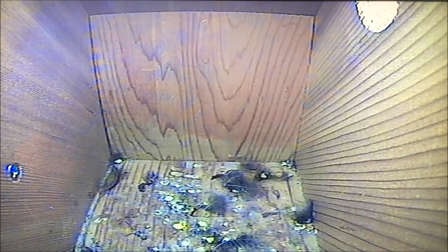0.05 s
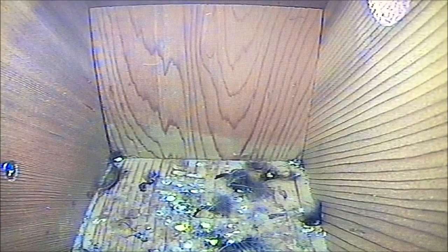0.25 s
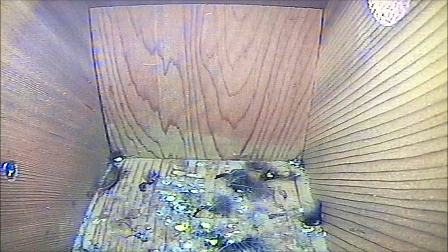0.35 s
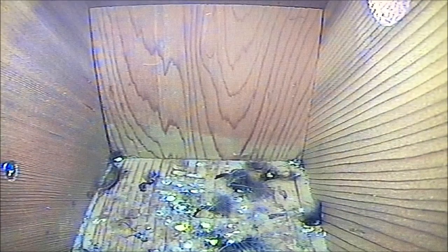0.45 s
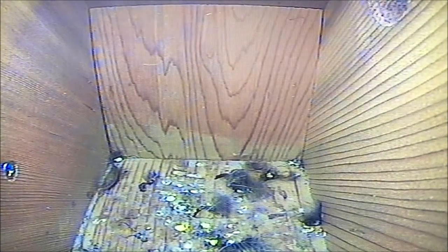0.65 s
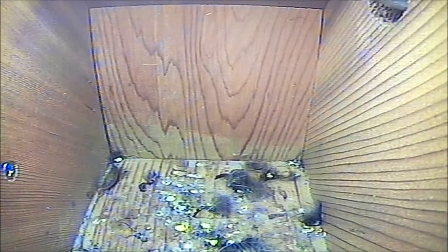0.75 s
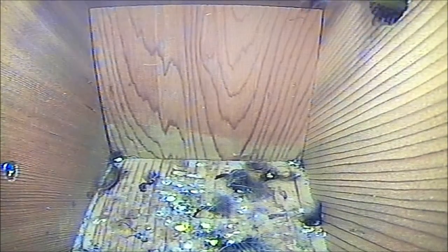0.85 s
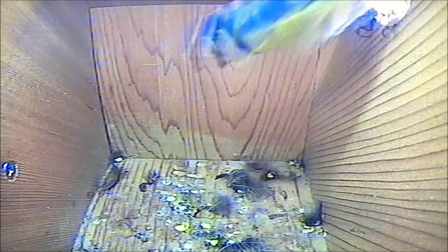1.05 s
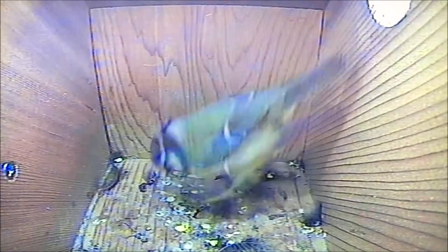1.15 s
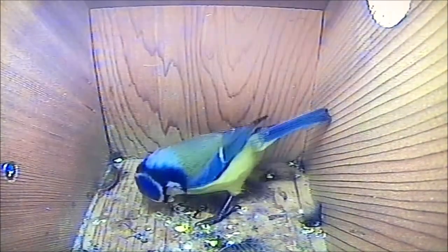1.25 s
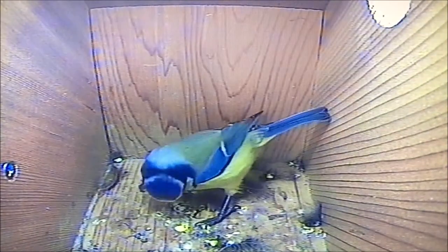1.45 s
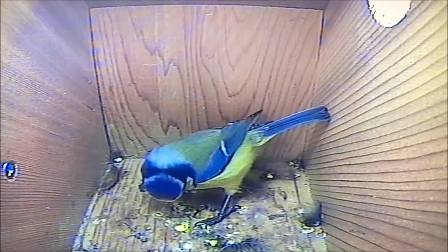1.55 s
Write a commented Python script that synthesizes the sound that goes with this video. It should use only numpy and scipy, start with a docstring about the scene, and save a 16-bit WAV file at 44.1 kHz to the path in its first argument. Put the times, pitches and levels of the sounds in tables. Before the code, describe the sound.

A small bird's claws scuff on a wooden nest box, heard from inside, starting at 0.2 seconds. At 0.5 seconds it lands with a sharp, hollow tap, the loudest moment. Wings brush softly at 1.1 seconds, then light scratchy steps follow from 1.2 to 1.6 seconds. Far outside, another bird whistles thinly, trilling from 1.1 seconds, over faint steady hum, outdoor air and hiss.

```python
"""Inside a wooden nest box, a small bird is heard scuffing on the outer wall, landing hard at the
entrance hole, fluttering down and shuffling on the floor. Its claws catch and slip, which makes the
panels ring; its weight thumps the box and its wings brush the walls. Far off, another bird whistles
and trills among echoing trees, over mains hum, outdoor air and faint hiss.
The sound switches on a moment after the start."""
import sys
import numpy as np
from scipy import signal
from scipy.fft import rfft, irfft
from scipy.io import wavfile
from scipy.ndimage import uniform_filter1d

SR = 44100
rng = np.random.default_rng(int(sys.argv[2]) if len(sys.argv) > 2 else 0)


def log_audio(samples):
    """Write samples as a 16-bit WAV file to the path given in sys.argv[1]."""
    # one column per channel
    frames = np.atleast_2d(samples).T
    # limit to full scale, then quantise
    limited = np.clip(frames, -1, 1)
    pcm = np.round(limited * 32767).astype(np.int16)
    wavfile.write(sys.argv[1], SR, pcm)


N = 70560
T = np.arange(N) / SR

WALL, ENTRANCE, FLOOR = range(3)   # places the bird touches
# The tones the box rings at, and how strongly a touch at each place wakes them:
# (pitch [Hz], time to fade 60 dB [s], outer wall [dB], entrance [dB], floor [dB])
BOX_TONES = [(174.7, 0.076, -5, -30, -23.5), (292.8, 0.19, -6.5, -18, -17), (414.8, 0.08, -2, -11, -27),
             (514.5, 0.048, -2, -14.5, -20), (612.5, 0.084, -7, -19.5, -18.5),
             (657.6, 0.076, -8.5, -11.5, -19.5), (961.5, 0.042, -8, -16, -16), (1071.3, 0.079, 3, -18, -19),
             (1179, 0.089, -8.5, -12.5, -9.5), (1333.6, 0.065, -3, -1, -5.5), (1456.2, 0.079, -3, 0.5, 2),
             (1630.5, 0.1, -1, -2, -9.5), (1741, 0.093, -3.5, 0, -12.5), (1856, 0.09, -1, -14.5, -8.5),
             (1915, 0.057, -13, -9, -34), (2260, 0.12, -27, -21, -29), (2575, 0.056, -15, -19.5, -26),
             (2872, 0.11, -29, -17, -33), (3330, 0.1, -24.5, -20, -21.5), (3346, 0.048, -24, -15, -27.5),
             (3650, 0.063, -17.5, -15, -24), (4350, 0.064, -15.5, -22.5, -37),
             (4580, 0.032, -38, -21.5, -23), (5580, 0.032, -44, -24, -44)]
# Foot scuffs: (time [s], length [s], ring level [dB], rasp level [dB], thump level [dB], place)
FOOT_SCUFFS = [(0.199, 0.028, -44, -73, -68, WALL), (0.228, 0.021, -45, -63, -87, WALL),
               (.324, 0.01535, -45.5, -87, -52.5, WALL), (0.375, 0.044, -50, -60, -59, WALL),
               (0.434, 0.0173, -44.5, -57.5, -43.5, WALL), (0.462, 0.0084, -55.5, -64, -51.5, WALL),
               (.51, 0.0053, -36, -54.5, -89, ENTRANCE), (.517, 0.0158, -29.5, -45, -91, ENTRANCE),
               (1.209, 0.0117, -60, -60, -84, FLOOR), (1.309, 0.022, -44.5, -64, -76, FLOOR),
               (1.408, 0.019, -48, -84, -86, FLOOR), (1.48, .014, -53, -78, -65, FLOOR),
               (1.591, .014, -50, -60.5, -63, FLOOR)]
# Tone colour of claws rasping on wood: (frequency [Hz], relative level [dB])
RASP_COLOUR = [(200, 4), (450, 14.5), (800, -9), (1600, -4), (2400, -6), (3400, 2.5), (4500, -4.5),
               (5000, -10.5), (6200, -5.5), (7100, -22), (8050, -6.5), (8800, -22), (10500, -17.5),
               (15000, -42)]
# Claw tips skating lightly over the wood: (time [s], length [s], level [dB])
CLAW_TICKS = [(0.38, 0.094, -65.5), (0.44, 0.014, -60), (1.262, 0.0049, -63.5), (1.457, 0.01, -62.5)]
# Tone colour of those ticks: (frequency [Hz], relative level [dB])
CLAW_TICK_COLOUR = [(1000, -3), (2600, 1.5), (3500, 2), (4500, -5), (5200, -13), (6100, -4), (7000, -17),
                    (8000, -12), (9000, -17), (10500, -12), (14000, -30)]
# Tone colour of feathers brushing wood: (frequency [Hz], relative level [dB])
WING_COLOUR = [(500, 5.5), (1600, 4.5), (2600, -1), (3600, 2.5), (6000, -1.5), (8500, -13), (14000, -27)]
# The far bird's whistles: (time [s], length [s], pitch [Hz], slide [Hz], level [dB], relative echo [dB])
SONG_NOTES = [(0.224, .018, 6950, -54, -70, -10), (.249, 0.028, 6920, -2, -68, 0),
              (0.28, 0.021, 7800, 97, -71.5, 2), (.313, 0.025, 7950, -200, -68.5, 1),
              (0.395, 0.011, 8000, 153, -68.5, -8), (0.418, 0.1, 4625, -30, -61, 0.5),
              (0.554, 0.16, 8150, -200, -69, -11), (0.72, 0.07, 5434, -35, -65, -2),
              (0.776, .04, 5750, 491, -68.5, 6), (0.829, 0.067, 7190, -950, -65, 3.5),
              (.88, .06, 6280, -1200, -67.5, 17), (0.976, 0.063, 7150, -950, -66, 4),
              (1.038, 0.059, 6480, -1600, -68, 2)]
# The two falling notes its trill repeats: (delay [s], length [s], pitch [Hz], slide [Hz], level [dB])
TRILL_NOTES = [(0, 0.0144, 5616, -700, -72), (0.022, 0.0169, 4460, -1100, -67.5)]
# Steady tones of the hum: (pitch [Hz], level [dB])
HUM_TONES = [(49.7, -60.5), (199.5, -67), (286, -65.5), (351, -72.5), (602, -76.5)]
# Tone colour of the outdoor air: (frequency [Hz], relative level [dB])
AIR_COLOUR = [(15, -37), (25, -9), (59, -1.5), (140, -8), (204, -10), (246, -10.5), (389, -9), (495, -15),
              (598, -19), (762, -20.5), (1410, -14.5), (1900, -21), (2420, -37), (3440, -25.5), (4870, -28),
              (5730, -30), (7100, -34.5), (7700, -35.5), (15500, -39.5)]
# Tone colour of the microphone's hiss: (frequency [Hz], relative level [dB])
HISS_COLOUR = [(2000, 8), (5000, 1.5), (9000, -4), (15500, -22)]

GRIP_SHARE = 0.3   # the part of a scuff spent pressing in


def feet():
    """Each scuff rings the box, rasps and thumps with the bird's weight; light ticks only rasp."""
    out, t = np.zeros(N), T[:SR // 4]
    thump = thud(hz=164.6, rise_s=0.0068)
    for start, length, ring_db, rasp_db, thump_db, place in FOOT_SCUFFS:
        add(out, start, from_db(ring_db) * box_ring(foot_pressure(t, length), place))
        add(out, start, from_db(rasp_db) * claw_rasp(t, length, RASP_COLOUR))
        add(out, start, from_db(thump_db) * thump)
    for start, length, db in CLAW_TICKS:
        add(out, start, from_db(db) * claw_rasp(t, length, CLAW_TICK_COLOUR))
    add(out, 0.57, from_db(-53) * thud(hz=44.7, rise_s=0.029))   # the landing rocks the box
    after_ring = signal.fftconvolve(out, echo_tail(fade_s=0.44))[:N]   # the whole box rings on faintly
    return out + from_db(-11) * after_ring


def foot_pressure(t, length):
    """A foot presses in, holds and lets go."""
    press = np.clip(t / (GRIP_SHARE * length), 0, 1)
    let_go = np.clip((length - t) / (length / 10), 0, 1)
    return press * let_go


def claw_slips(force, slips_per_s=2500, spread_db=2):
    """A dragged claw catches and slips in tiny uneven clicks, louder the harder it presses."""
    n = len(force)
    sizes = from_db(spread_db * rng.standard_normal(n)) * rng.choice([-1, 1], n)
    return force * sizes * (rng.random(n) < slips_per_s / SR)


def box_ring(force, place, band_ratio=1.16):
    """Claw slips set each tone of the box ringing, as strongly as the touched place allows."""
    out = 0
    for hz, fade_s, *place_db in BOX_TONES:
        band = signal.butter(2, [hz / band_ratio, hz * band_ratio], "band", fs=SR, output="sos")
        clicks = claw_slips(force) + 1e-18 * rng.standard_normal(len(force))
        tone = ring(signal.sosfilt(band, clicks), hz, fade_s)
        out = out + from_db(place_db[place]) * scale_by_loudest(tone)
    return scale_by_loudest(out)


def claw_rasp(t, length, colour, fade_s=0.063):
    """The dry sound of slipping claws: it builds, then dies quickly from halfway through the stroke."""
    press = np.clip(t / (GRIP_SHARE * length), 0, 1)
    fade = from_db(-60 * np.maximum(t - length / 2, 0) / fade_s)
    return scale_by_loudest(coloured(claw_slips(press * fade), colour))


def thud(hz, rise_s):
    """The bird's weight gives the box a low swing that swells and dies."""
    swell = (T / rise_s) ** 2 * np.exp(-2 * T / rise_s)
    return scale_by_loudest(np.sin(2 * np.pi * hz * T) * swell)


def wings(start_s=1.084, rise_s=0.038, fall_s=0.13):
    """Feathers brush the walls on the way down, in one soft swell of noise."""
    peak_s = start_s + rise_s
    swell = np.interp(T, [start_s, peak_s, peak_s + fall_s], [0, 1, 0])
    return from_db(-60.5) * noise(WING_COLOUR) * swell


def far_song(trill_start_s=1.112, trill_step_s=0.0745):
    """A far bird whistles and then trills, blurred by echoes among the trees."""
    song = np.zeros(N)
    for start, length, hz, slide_hz, db, echo_db in SONG_NOTES:
        add(song, start, from_db(db) * among_trees(whistle(length, hz, slide_hz), echo_db))
    for start in np.arange(trill_start_s, T[-1], trill_step_s):
        for delay, length, hz, slide_hz, db in TRILL_NOTES:
            note = among_trees(whistle(length, hz, slide_hz), echo_db=6)
            add(song, start + delay, from_db(db) * note)
    return song


def whistle(length, pitch_hz, slide_hz, waver_hz=55):
    """One slightly unsteady note that holds its pitch at first, then slides."""
    progress = np.linspace(0, 1, int(length * SR))
    waver = scale_by_average(uniform_filter1d(rng.standard_normal(len(progress)), size=100))
    hz = pitch_hz + slide_hz * progress ** 1.8 + waver_hz * waver
    swell = np.clip(np.sin(np.pi * progress) * 2, 0, 1)
    return scale_by_average(np.sin(2 * np.pi * np.cumsum(hz) / SR) * swell)


def among_trees(note, echo_db):
    """A far note arrives three ways: directly, bounced off nearby trees and as a long echo."""
    direct = scale_by_average(np.pad(note, (0, N - len(note))))
    bounced = scale_by_average(signal.fftconvolve(note, echo_tail(fade_s=0.086))[:N])
    echo = scale_by_average(signal.fftconvolve(note, echo_tail(fade_s=0.85))[:N])
    return scale_by_loudest(direct + from_db(0.5) * bounced + from_db(echo_db) * echo)


def background():
    """Mains hum, outdoor air, the box ringing softly as the air stirs it, and microphone hiss."""
    hum = sum(from_db(db) * np.sqrt(2) * np.sin(2 * np.pi * (hz * T + rng.random()))
              for hz, db in HUM_TONES)
    stirred_box = 0
    for hz, _, wall_db, _, floor_db in BOX_TONES:
        tone = scale_by_average(ring(rng.standard_normal(N), hz, fade_s=0.18))
        stirred_box = stirred_box + from_db((wall_db + floor_db) / 2) * tone
    air = from_db(-61) * noise(AIR_COLOUR)
    hiss = from_db(-76) * noise(HISS_COLOUR)
    return hum + air + from_db(-64) * scale_by_average(stirred_box) + hiss


def ring(x, hz, fade_s):
    """Let x shake something that rings at one pitch and fades 60 dB in fade_s."""
    decay, angle = from_db(-60 / (fade_s * SR)), 2 * np.pi * hz / SR
    return signal.lfilter([1, 0, -1], [1, -2 * decay * np.cos(angle), decay * decay], x + 1e-18)


def echo_tail(fade_s):
    """A dense cloud of echoes that fades 60 dB in fade_s, with a total energy of 1."""
    echoes = rng.standard_normal(N) * from_db(-60 * T / fade_s)
    return echoes / np.linalg.norm(echoes)


def noise(colour):
    """Steady noise with the given tone colour and an average level of 1."""
    return scale_by_average(coloured(rng.standard_normal(N), colour))


def coloured(x, colour):
    """Turn each frequency up or down, following a tone colour table."""
    hz, db = np.transpose(colour)
    frequencies = np.maximum(np.fft.rfftfreq(len(x), 1 / SR), 1)
    gains = from_db(np.interp(np.log(frequencies), np.log(hz), db))
    return irfft(rfft(x) * gains, len(x))


def from_db(db):
    """Turn decibels into a number to multiply by."""
    return 10 ** (np.asarray(db) / 20)


def scale_by_average(x):
    """Scale so that the average level (root mean square) is 1."""
    return x / np.sqrt(np.mean(x ** 2) + 1e-20)


def scale_by_loudest(x):
    """Scale so that the loudest hundredth of a second has a level of 1."""
    return x / np.sqrt(uniform_filter1d(x ** 2, size=SR // 100).max() + 1e-20)


def add(out, start_s, x):
    """Mix x into out, beginning at start_s."""
    i = int(np.clip(start_s * SR, 0, N - 1))
    out[i:i + len(x)] += x[:N - i]


def scene():
    """Everything heard inside the box, in one channel."""
    return (feet() + wings() + far_song() + background())[None]


def record(dry):
    """The sound switches on after 0.2 s, and the highest treble is cut away."""
    switch_on = np.clip((T - 0.2) / 0.004, 0, 1)
    treble_cut = signal.cheby2(20, 60, 16100, fs=SR, output="sos")
    return signal.sosfilt(treble_cut, dry * switch_on)


dry = scene()
out = record(dry)
log_audio(out)
```